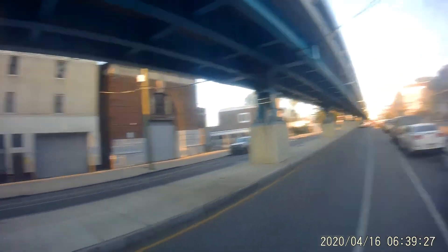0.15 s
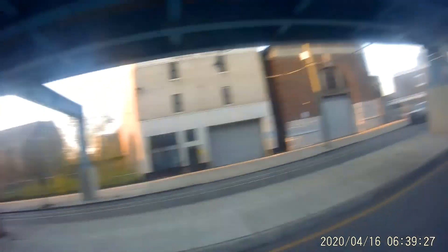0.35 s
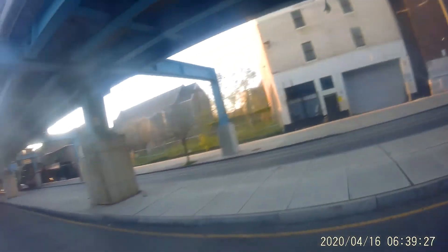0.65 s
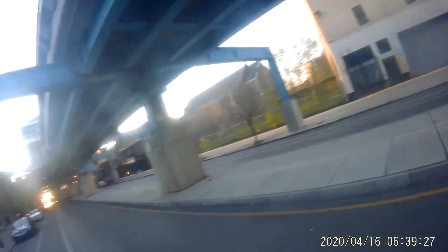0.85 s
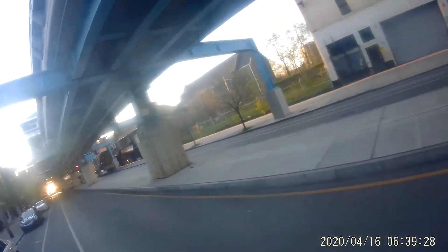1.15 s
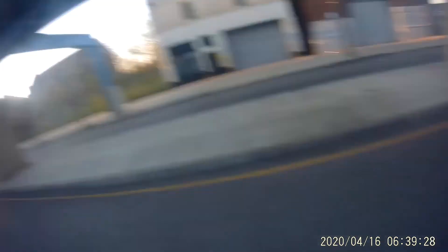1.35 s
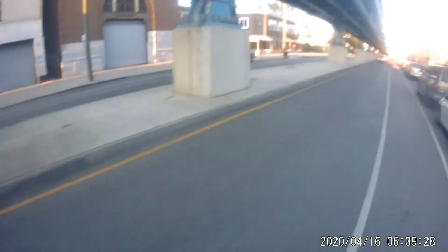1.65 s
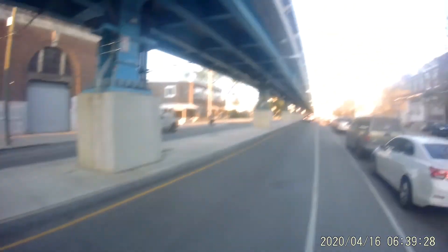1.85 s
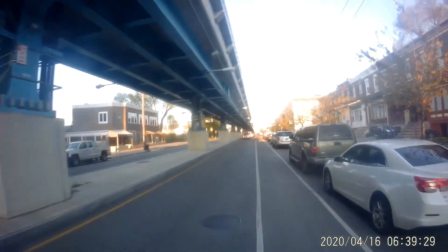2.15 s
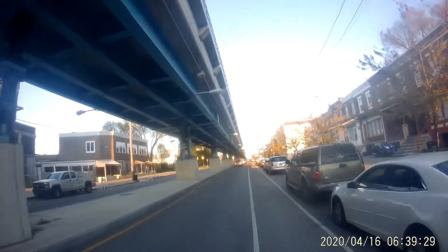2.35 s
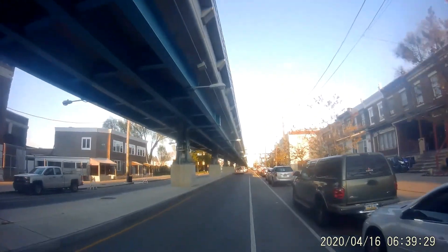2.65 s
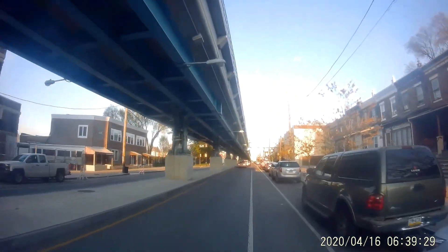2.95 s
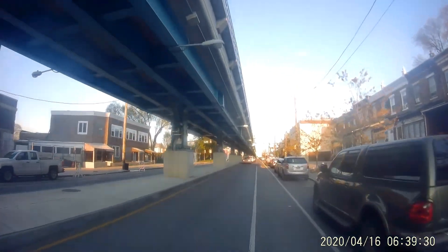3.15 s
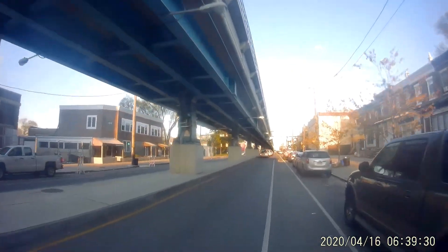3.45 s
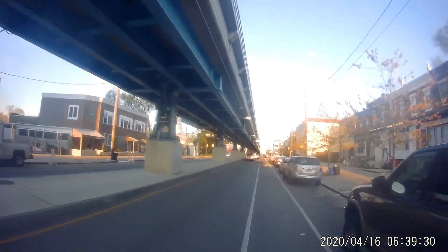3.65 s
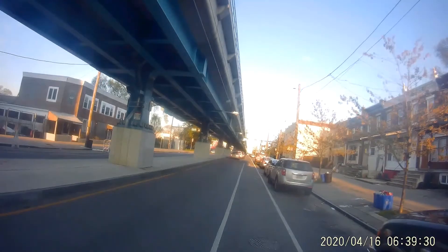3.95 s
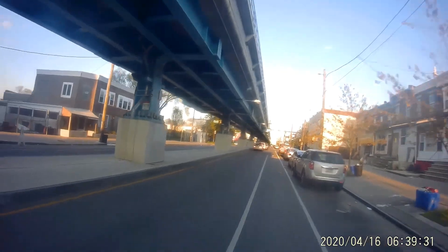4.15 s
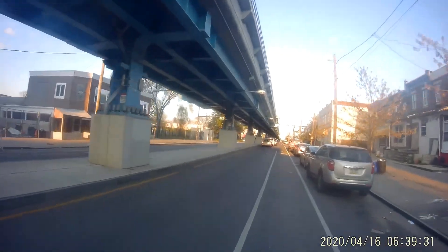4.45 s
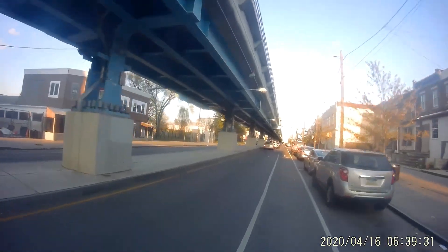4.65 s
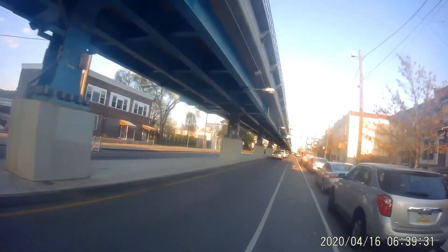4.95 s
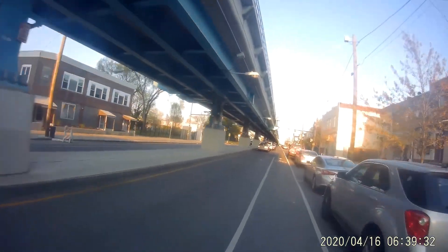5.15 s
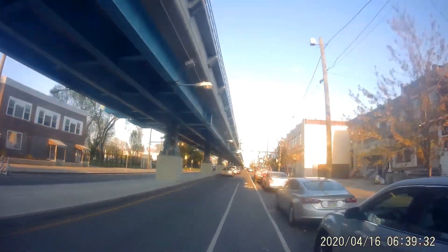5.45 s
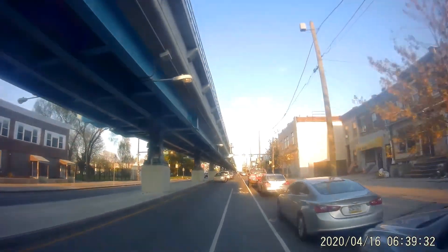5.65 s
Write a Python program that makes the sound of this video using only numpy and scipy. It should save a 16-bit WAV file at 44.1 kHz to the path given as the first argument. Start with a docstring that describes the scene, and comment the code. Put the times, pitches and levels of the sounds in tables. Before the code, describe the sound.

The small engine of a motorized bicycle clatters and climbs in pitch, over low wind buffeting and a single dull bump.

```python
"""A motorized bicycle putters through a turn in a city street and speeds up, heard from the saddle.
Its single cylinder fires into a ringing silencer; gears clatter in the case, fins tick, the chain rattles.
Engine speed and load set the level of these parts and of the tyre noise beneath them.
Wind rumbles on the microphone, which takes one dull knock. Now and then the engine clanks,
and at speed a faint, thin squeal comes and goes."""
import sys
import numpy as np
from scipy import signal
from scipy.fft import rfft, irfft, next_fast_len
from scipy.io import wavfile
from scipy.ndimage import map_coordinates

SR = 44100
rng = np.random.default_rng(int(sys.argv[2]) if len(sys.argv) > 2 else 0)


def unload_audio(sound):
    """Save the sound as a 16-bit wav file, at the path given as the first command line argument."""
    columns = np.transpose(np.atleast_2d(sound))
    # keep every value between -1 and 1, then stretch to whole-number steps
    steps = np.round(np.clip(columns, -1, 1) * 32767)
    wavfile.write(sys.argv[1], SR, steps.astype(np.int16))


N = 255780

# engine speed, one firing per turn of the crank: time_s, firing_hz
ENGINE_SPEED = [(0.0, 29.19), (0.47, 32.5), (0.7, 29.06), (1.24, 32.86), (1.38, 35.22), (1.58, 36.83),
                (1.81, 39.86), (2.44, 42.01), (2.75, 41.74), (2.98, 43.86), (3.5, 45.64), (3.68, 48.9),
                (4.06, 50.64), (4.61, 55.81), (4.88, 54.88), (5.12, 56.38), (5.37, 55.41), (5.8, 58.19)]
# resonances of the hot engine case and clutch cover: pitch_hz, width_hz, level_db
CASE_MODES = [(805, 71, 2.5), (1033, 84, 0), (1315, 186, 3), (1475, 86, -8.5), (1610, 62, 0.5),
              (1765, 67, -6.5)]
COVER_MODES = [(2043, 80, 0.5), (2124, 54, 0), (2262, 100, -7)]


def amp(db):
    """Decibels to gain."""
    return 10 ** (np.asarray(db) / 20)


def unit(x):
    """x at rms 1."""
    return x / np.sqrt(np.mean(x ** 2) + 1e-20)


def curve(rows):
    """A line through (time_s, value) points, one value per sample."""
    return np.interp(np.arange(N) / SR, *np.transpose(rows))


def swells(rows):
    """Bell-shaped rises and dips in dB, from rows of (centre_s, gain_db, half_length_s)."""
    t = np.arange(N) / SR
    return sum(db * np.exp(-((t - s) / half) ** 2) for s, db, half in rows)


def wobble(rate_hz):
    """A smooth random curve, rate_hz knots a second."""
    knots = rng.standard_normal(int(N * rate_hz / SR) + 4)
    return map_coordinates(knots, [np.arange(N) * rate_hz / SR])


def fade_in(start_s, settle_s, depth_db):
    """A gain that stays low until start_s, then rises quickly to 1."""
    since = np.maximum(np.arange(N) / SR - start_s, 0)
    return amp(-depth_db * np.exp(-since / settle_s))


def filtered(x, response):
    """x times a complex response of frequency."""
    size = next_fast_len(N + SR // 2)
    return irfft(rfft(x, size) * response(np.fft.rfftfreq(size, 1 / SR)), size)[:N]


def coloured(x, spectrum):
    """x shaped by (frequency_hz, level_db) points, at rms 1."""
    hz, db = np.transpose(spectrum)
    return unit(filtered(x, lambda f: amp(np.interp(np.log(f + 1), np.log(hz), db))))


def ringing(x, modes, low_hz, high_hz):
    """x rung through (pitch_hz, width_hz, level_db) resonances with steep band edges, at rms 1."""
    body = lambda f: sum(amp(db) * 1j * f * w / (c * c - f * f + 1j * f * w) for c, w, db in modes)
    low_cut = signal.butter(5, low_hz, "highpass", fs=SR, output="sos")
    high_cut = signal.butter(11, high_hz, "lowpass", fs=SR, output="sos")
    return unit(signal.sosfilt(np.vstack([low_cut, high_cut]), filtered(x, body)))


def heated(x, modes, speed, low_hz, high_hz):
    """x rung through resonances that crossfade to a higher pitch as the engine speeds up and heats."""
    cool_pitch_ratio, cool_firing_hz, hot_firing_hz = 0.94, 32.2, 45.7
    heat = np.clip((speed - cool_firing_hz) / (hot_firing_hz - cool_firing_hz), 0, 1)
    cool_modes = [(hz * cool_pitch_ratio, width, db) for hz, width, db in modes]
    cool = ringing(x, cool_modes, low_hz, high_hz * cool_pitch_ratio)
    return unit((1 - heat) * cool + heat * ringing(x, modes, low_hz, high_hz))


def clicks(times, sizes):
    """Impulses at the given times, shared between neighbouring samples."""
    at = np.clip(times * SR, 0, N - 2)
    i = at.astype(int)
    return np.bincount(i, sizes * (1 - at + i), N) + np.bincount(i + 1, sizes * (at - i), N)


def flares(hits, rise_s, decay_s):
    """A quick rise and decay after each impulse."""
    t = np.arange(SR // 20) / SR
    return signal.fftconvolve(hits, (1 - np.exp(-t / rise_s)) * np.exp(-t / decay_s))[:N]


def bursts(hits, share, rise_s, decay_s):
    """An envelope with a share of its power flaring after each hit and the rest steady."""
    flare = np.abs(flares(hits, rise_s, decay_s))
    share = np.clip(share, 0, .95)
    return np.sqrt(1 - share + share * flare / flare.mean())


def effort(cruise_db, per_load, octave_db):
    """A part's gain: cruise_db, plus per_load dB per dB of load and octave_db per doubling of speed."""
    # the throttle opens in stages, eases near 5 s and opens again: time_s, load_db over cruising
    load = [(.25, -11), (.47, -6), (1.0, -2.5), (1.27, -1.5), (1.43, 0.5), (1.68, 0), (2.38, 0.4),
            (2.6, 1.5), (2.92, -1.5), (3.05, 1), (3.45, 2), (3.7, 3), (4.0, 4), (4.3, 2.8), (4.87, 1.2),
            (5.03, -4.5), (5.33, -4), (5.55, 0.5), (5.77, 3.5)]
    cruise_hz = 45
    octaves = np.log2(curve(ENGINE_SPEED) / cruise_hz)
    return amp(cruise_db + per_load * curve(load) + octave_db * octaves)


def wind():
    """Wind buffets the microphone in low lumps, strongest in the turn."""
    # gusts: time_s, level_db
    gusts = [(.25, -57), (.8, -41.5), (1.2, -41), (1.7, -54), (2.35, -50), (2.75, -44.5), (3.4, -48),
             (4.3, -50), (4.65, -45), (5.1, -49)]
    # tone of the rumble: frequency_hz, level_db
    rumble = [(10, -19), (28, 7.5), (45, 8), (75, -15), (150, -28), (300, -22), (800, -41), (3000, -77)]
    lumps = amp(1.1 * wobble(9))
    return amp(curve(gusts)) * lumps * coloured(rng.standard_normal(N), rumble)


def tyres():
    """Tyres roll over an uneven road, louder as the engine works harder."""
    # tone of the road: frequency_hz, level_db
    road = [(40, 0), (130, 1), (250, -6), (600, -9), (1500, -6), (3000, -30), (15000, -66)]
    surface = amp(1.2 * wobble(10))
    roll = effort(-46, per_load=0.19, octave_db=5.9) * surface * coloured(rng.standard_normal(N), road)
    return roll * fade_in(start_s=0.13, settle_s=0.063, depth_db=35)


def crank_pulses(speed, slow_jitter_s, scatter_db, lag_turns):
    """One uneven impulse each turn of the crank, more ragged when the engine is slow or burbles."""
    # burble as the throttle eases: centre_s, extra_scatter_db, half_length_s
    burbles = [(5.17, 3, .25)]
    burble_s_per_db = .00007
    turns = np.cumsum(speed) / SR - lag_turns
    at = np.searchsorted(turns, np.arange(1, int(turns[-1]) + 1))
    late, strong = rng.standard_normal((len(at), 2)).T
    burble_db = swells(burbles)[at]
    jitter_s = slow_jitter_s * (speed.min() / speed[at]) ** 4 + burble_s_per_db * burble_db
    sizes = amp((scatter_db + burble_db) * strong) / np.sqrt(speed[at])
    return clicks(at / SR + jitter_s * late, sizes)


def boom(fire):
    """The silencer's whole volume swings at one low resonance, picking out the nearest engine order."""
    # the boom swells and sinks with the throttle: centre_s, gain_db, half_length_s
    surges = [(.38, 6, 0.21), (.85, -3, 0.26), (1.55, 1.5, 0.28), (4.6, 4.5, 0.19)]
    level = effort(-46, per_load=1, octave_db=0.36) * amp(swells(surges))
    return level * ringing(fire, [(102.5, 29, 0)], low_hz=62.0, high_hz=133.3)


def drone(speed, firing_hz, width_hz, boost_db):
    """A cavity's extra gain around the firing rate that suits it."""
    return amp(boost_db * np.exp(-((speed - firing_hz) / width_hz) ** 2))


def exhaust(fire, bursty, speed):
    """Each puff of gas rings the silencer's chambers, its pipes and its thin shell."""
    # silencer resonances in four groups: pitch_hz, width_hz, level_db
    chamber_modes = [(337.4, 32, -1), (387.4, 64, 6.5)]
    tailpipe_modes = [(454.5, 34, 0)]
    header_modes = [(757.7, 75, -6.5), (824, 15, -8)]
    bark_modes = [(1033, 47, -1.1), (1316, 57, 1.6), (1576, 71, -2.4), (2090, 46, -1)]
    # the header honks on wide throttle, the shell buzzes as speed builds: centre_s, gain_db, half_length_s
    honks = [(3.68, 4, 0.078), (5.65, 6, 0.25)]
    buzzes = [(1.87, 9.5, 0.11), (3.42, 7, 0.11), (3.68, 9.5, 0.093)]
    turbulence = unit(rng.standard_normal(N) * bursts(fire, bursty, rise_s=0.00077, decay_s=0.011))
    puff = lambda noise_db: unit(fire) + amp(noise_db) * turbulence
    silencer = lambda x, modes: ringing(x, modes, low_hz=316, high_hz=2155)
    chamber = effort(-47.5, per_load=1.74, octave_db=-13) * silencer(fire, chamber_modes)
    chamber *= drone(speed, firing_hz=50.6, width_hz=6.4, boost_db=7.6)
    tailpipe = effort(-42, per_load=0.45, octave_db=9.5) * silencer(puff(noise_db=-2), tailpipe_modes)
    tailpipe *= drone(speed, firing_hz=42.4, width_hz=3.2, boost_db=5)
    header = effort(-41.5, per_load=0.98, octave_db=0) * silencer(fire, header_modes)
    header *= amp(swells(honks))
    bark = heated(fire, bark_modes, speed, low_hz=317, high_hz=2180)
    bark *= effort(-40, per_load=1, octave_db=1.8)
    shell = ringing(puff(noise_db=5), [(1260, 24, -1), (1310, 12, -2)], low_hz=894, high_hz=1445)
    shell *= effort(-38.5, per_load=0.86, octave_db=5) * amp(swells(buzzes))
    putter = boom(fire) + chamber + tailpipe + header + bark + shell
    return putter * fade_in(start_s=0.18, settle_s=0.033, depth_db=34)


def contacts(rate_hz, scatter_db, rub_db):
    """Random metal-on-metal ticks over smooth rubbing noise."""
    ticks = (rng.random(N) < rate_hz / SR) * rng.choice([-1, 1], N)
    sizes = amp(scatter_db * rng.standard_normal(N))
    return unit(unit(ticks * sizes) + amp(rub_db) * rng.standard_normal(N))


def gears(speed, per_turn=40, drift_hz=11, play_s=.00013):
    """Teeth meet at the same crank angles each turn, drifting in strength; play scatters their timing."""
    turns = np.cumsum(speed) / SR
    angles = (np.arange(per_turn) + rng.random(per_turn)) / per_turn
    times = np.interp(np.arange(int(turns[-1]) + 1) + angles[:, None], turns, np.arange(N) / SR)
    knots = rng.standard_normal((per_turn, int(N / SR * drift_hz) + 2))
    sizes = np.array([map_coordinates(k, [s * drift_hz]) for k, s in zip(knots, times)])
    sizes *= times < times.max()
    scattered = times + play_s * rng.standard_normal(times.shape)
    return unit(clicks(scattered.ravel(), sizes.ravel()) / np.sqrt(speed))


def casing(fire, slap, bursty, speed):
    """Gears and loose parts clatter in the case after each firing and in its cover after each slap."""
    # the clutch cover rings up under load: centre_s, gain_db, half_length_s
    cover_swells = [(3.65, 2, .3)]
    clatter = unit(gears(speed) + amp(1) * contacts(rate_hz=1500, scatter_db=0.5, rub_db=-0.5))
    after_firing = bursts(fire, 1.15 * bursty, rise_s=0.002, decay_s=0.011)
    after_slap = bursts(slap, 1.13 * bursty, rise_s=0.0013, decay_s=0.0056)
    case = heated(clatter * after_firing, CASE_MODES, speed, low_hz=694, high_hz=1900)
    case *= effort(-33.5, per_load=1.15, octave_db=0)
    cover = heated(clatter * after_slap, COVER_MODES, speed, low_hz=1830, high_hz=2310)
    cover *= effort(-39.5, per_load=1.22, octave_db=0) * amp(swells(cover_swells))
    return case + cover


def fins(shake, bursty):
    """Piston slaps tick on the cooling fins, louder when the bursts are harder."""
    # fin resonances: pitch_hz, width_hz, level_db
    fin_modes = [(3100, 63, 6), (3400, 180, 10.5), (3698, 49, 12), (3800, 24, 7.5), (4700, 140, 0),
                 (5450, 340, -13)]
    level = effort(-50, per_load=0.97, octave_db=-1.1) * amp(10.5 * (bursty - bursty.mean()))
    ticks = contacts(rate_hz=1200, scatter_db=4, rub_db=-3) * shake
    return level * ringing(ticks, fin_modes, low_hz=2760, high_hz=5370)


def chain(shake):
    """Each jerk rattles the chain's links, their level fluttering quickly."""
    # tone of the links: frequency_hz, level_db
    link_tone = [(1500, -20), (2300, 13.5), (2550, 9), (2900, 4), (3600, 10), (4250, 1), (4800, 5),
                 (5500, -7), (6600, -15.5), (9000, -21.5), (15000, -58)]
    level = effort(-49, per_load=2.45, octave_db=12.4) * amp(.9 * wobble(22.13))
    ticks = contacts(rate_hz=700, scatter_db=3.2, rub_db=3.5) * shake
    return level * coloured(ticks, link_tone)


def guard_rasp(slap):
    """Each piston slap jerks the chain into a scrape against its guard."""
    # guard resonances: pitch_hz, width_hz, level_db
    guard_modes = [(4020, 330, -3.5), (4840, 760, 0.5), (5270, 260, -5.5)]
    # harder rasps at full pull: centre_s, gain_db, half_length_s
    rasps = [(3.96, 10.5, 0.23), (5.78, 12, 0.065)]
    level = effort(-61.5, per_load=1.5, octave_db=0) * amp(swells(rasps))
    scrapes = rng.standard_normal(N) * bursts(slap, 0.51, rise_s=0.0004, decay_s=0.0031)
    return level * ringing(scrapes, guard_modes, low_hz=3300, high_hz=5800)


def sizzle(slap, bursty):
    """A bright, flickering hiss follows each piston slap, louder when the bursts are harder."""
    # tone of the hiss: frequency_hz, level_db
    hiss_tone = [(4000, -6), (5500, 9), (6800, 6), (8000, -1), (9400, -2), (10500, 4), (12200, -1),
                 (13700, 0.5), (14400, -2), (15600, -18)]
    hiss = rng.standard_normal(N) * bursts(slap, 1.16 * bursty, rise_s=0.005, decay_s=0.0037)
    flicker = amp(9.5 * (bursty - bursty.mean()) + 2.3 * wobble(24))
    return effort(-60, per_load=0.86, octave_db=-1.5) * flicker * coloured(hiss, hiss_tone)


def road_bounce(x, delay_s, gain):
    """x with its reflection from the road, at the same power."""
    return filtered(x, lambda hz: 1 + gain * np.exp(-2j * np.pi * hz * delay_s)) / np.hypot(1, gain)


def metalwork(fire, bursty, speed):
    """The firings and the piston's later slap shake the case, fins and chain into one rattle."""
    # the slap lands early when slow, near half a turn cruising, earlier at top speed: time_s, lag_turns
    slap_lag = [(1.2, 0), (1.55, .07), (1.8, .36), (2.3, .56), (3.5, .42), (3.9, .26), (4.2, .25),
                (4.5, .1), (5.3, .1), (5.6, .27)]
    slap = crank_pulses(speed, slow_jitter_s=.0006, scatter_db=3, lag_turns=curve(slap_lag))
    shake = bursts(slap, 0.97 * bursty, rise_s=0.0007, decay_s=0.0024)
    rattle = casing(fire, slap, bursty, speed) + fins(shake, bursty)
    rattle += chain(shake) + guard_rasp(slap) + sizzle(slap, bursty)
    rattle *= fade_in(start_s=0.235, settle_s=0.016, depth_db=35)
    return road_bounce(rattle, delay_s=.0064, gain=0.16)


def combustion(speed):
    """A short hard rap of the cylinder on each firing, never twice alike."""
    # the cylinder's heavily damped resonance: pitch_hz, width_hz, level_db
    cylinder_modes = [(1386, 200, 0)]
    # the raps harden, most at top speed: centre_s, gain_db, half_length_s
    hammering = [(2.2, 0.5, .6), (4.3, 5, 0.18), (4.8, 3.5, 0.12)]
    raps = crank_pulses(speed, slow_jitter_s=.0005, scatter_db=1.8, lag_turns=.02)
    level = effort(-40, per_load=0.65, octave_db=5.2) * amp(swells(hammering))
    level *= fade_in(start_s=0.24, settle_s=0.0054, depth_db=30)
    return level * ringing(raps, cylinder_modes, low_hz=910, high_hz=2180)


def clanks(speed):
    """Now and then a harder blow sets the case and its cover clanking."""
    # single blows: start_s, relative_level_db
    blows = [(.978, -23), (1.23, -21), (1.319, -20), (1.348, -17), (1.436, -19), (4.724, -13), (4.868, -11),
             (5.227, -16), (5.298, -16)]
    start_s, level_db = np.transpose(blows)
    envelope = flares(clicks(start_s, amp(level_db - 5.5)), rise_s=.0005, decay_s=.0035)
    metal = heated(rng.standard_normal(N), CASE_MODES + COVER_MODES, speed, low_hz=603, high_hz=2170)
    return envelope * metal


def engine():
    """One cylinder drives the exhaust and the metalwork, with raps and clanks on top."""
    # how strongly the noise pulses with the crank: time_s, burstiness (0-1)
    burstiness = [(.3, 0.24), (.6, 0.4), (1, 0.55), (1.45, 0.52), (1.8, 0.11), (2.85, 0.2), (3.25, 0.25),
                  (4.7, 0.32), (5.3, 0.23), (5.8, 0.53)]
    speed, bursty = curve(ENGINE_SPEED), curve(burstiness)
    fire = crank_pulses(speed, slow_jitter_s=.00028, scatter_db=1, lag_turns=-.05)
    running = exhaust(fire, bursty, speed) + metalwork(fire, bursty, speed)
    return running + combustion(speed) + clanks(speed)


def squeal(waver):
    """A faint, very high squeal cuts in and out at speed."""
    # spells of squealing: centre_s, level_db, half_length_s
    spells = [(2.737, -67, 0.055), (3.16, -66, 0.06), (3.64, -66, 0.125), (3.96, -66, 0.065),
              (4.52, -68, 0.125), (4.89, -69, 0.055)]
    # its two partials: pitch_hz, gain_db
    partials = [(10404, 1.5), (13867, 3)]
    t = np.arange(N) / SR
    level = sum(amp(db) * np.exp(-((t - s) / half) ** 6) for s, db, half in spells)
    clock = np.cumsum(1 + waver * wobble(60)) / SR
    return level * sum(amp(db) * np.sin(2 * np.pi * hz * clock) for hz, db in partials)


def knock(thud_hz, thud_db, thud_delay_s, thud_width_s):
    """A jolt pushes the microphone out and back, with a short dull thud on the way."""
    # the jolt: start_s, relative_level_db, length_s
    jolts = [(2.963, -12.5, 0.039)]
    out = np.zeros(N)
    for start_s, level_db, length_s in jolts:
        t = np.arange(N) / SR - start_s
        push = -np.sin(2 * np.pi * np.clip(t / length_s, 0, 1))
        from_thud = t - thud_delay_s
        thud = np.cos(2 * np.pi * thud_hz * from_thud) * np.exp(-(from_thud / thud_width_s) ** 2)
        out += amp(level_db - 11.5) * (push + amp(thud_db) * thud)
    return out


def scene():
    """Wind, tyres, engine, squeal and knock at one microphone."""
    ride = wind() + tyres() + engine() + squeal(waver=0.00127)
    jolt = knock(thud_hz=113, thud_db=0.5, thud_delay_s=0.01, thud_width_s=0.0046)
    return (ride + jolt)[None]


def record(dry):
    """The microphone adds a faint hiss of its own and passes nothing above its band limit."""
    top_hz = 15650
    hiss = amp(-66) * coloured(rng.standard_normal(N), [(300, 16.5), (3000, 1), (8000, -4), (15000, 0)])
    return filtered(dry[0] + hiss, lambda hz: hz < top_hz)[None]


dry = scene()
out = record(dry)
unload_audio(out)
```